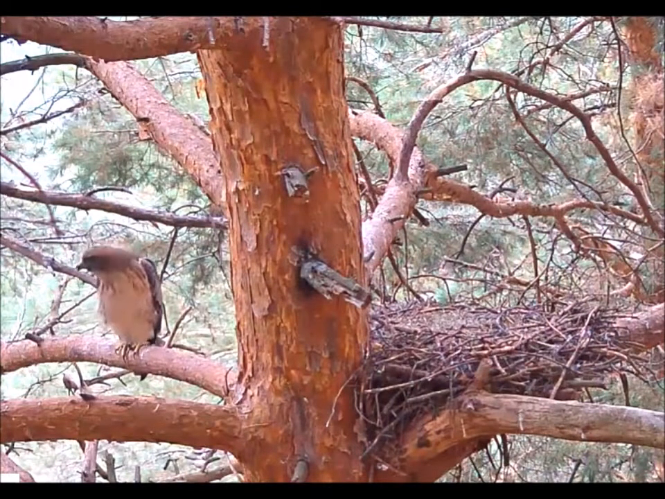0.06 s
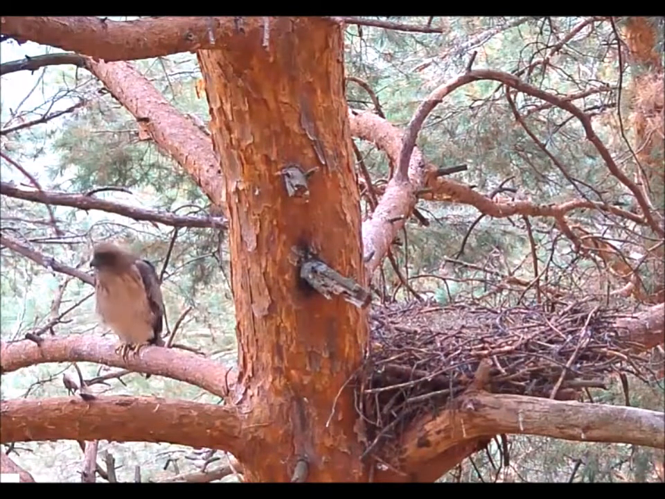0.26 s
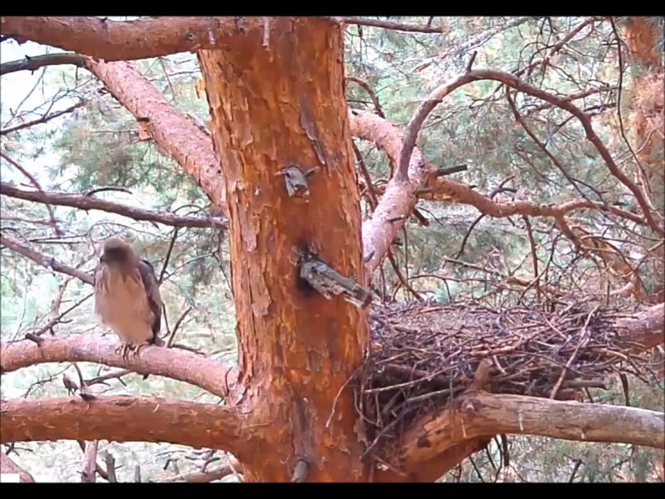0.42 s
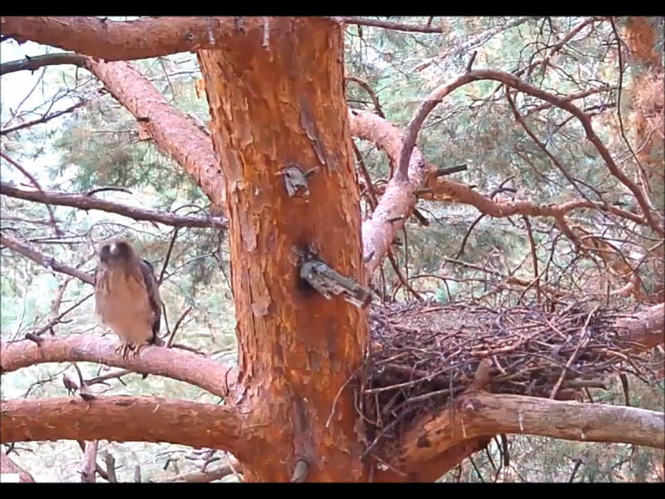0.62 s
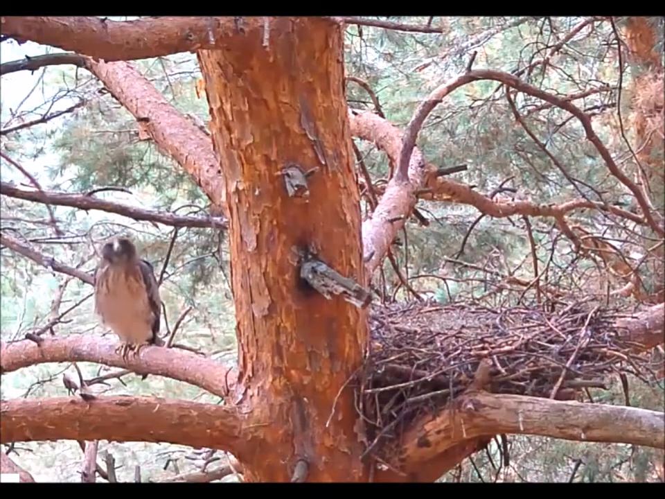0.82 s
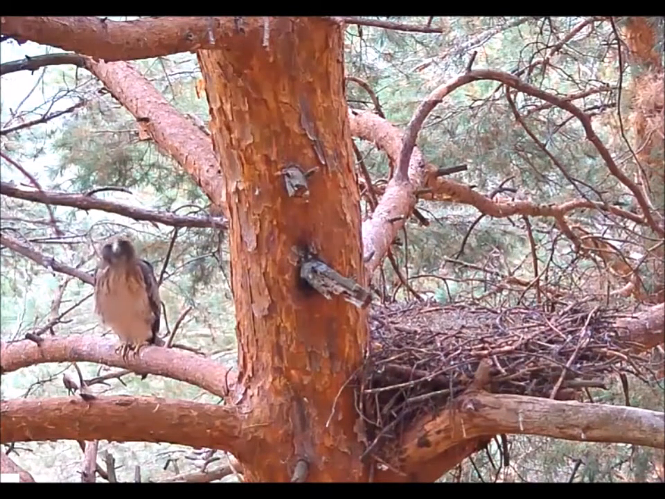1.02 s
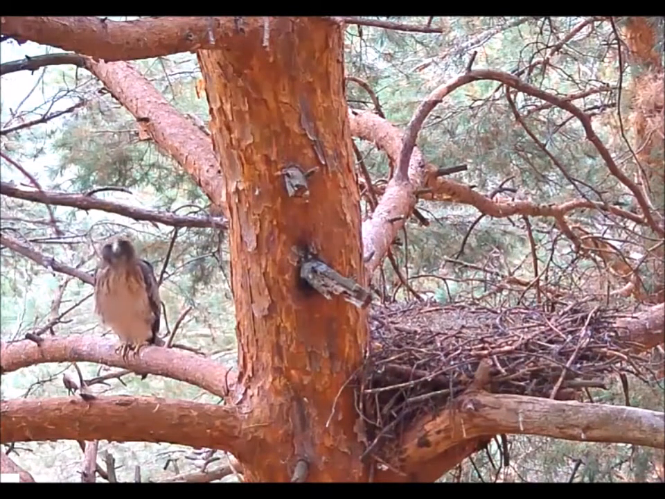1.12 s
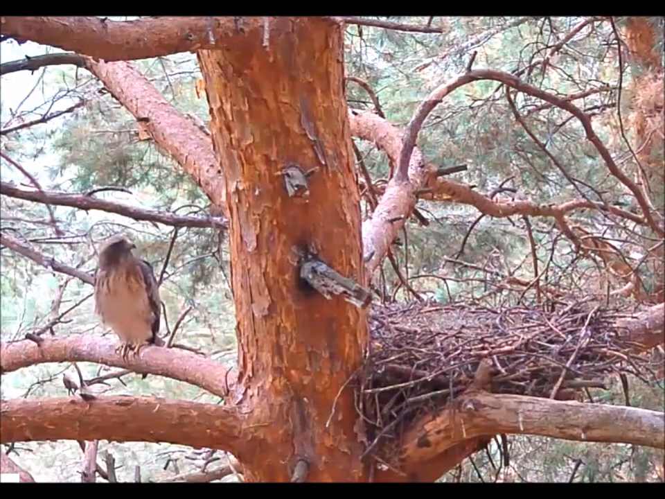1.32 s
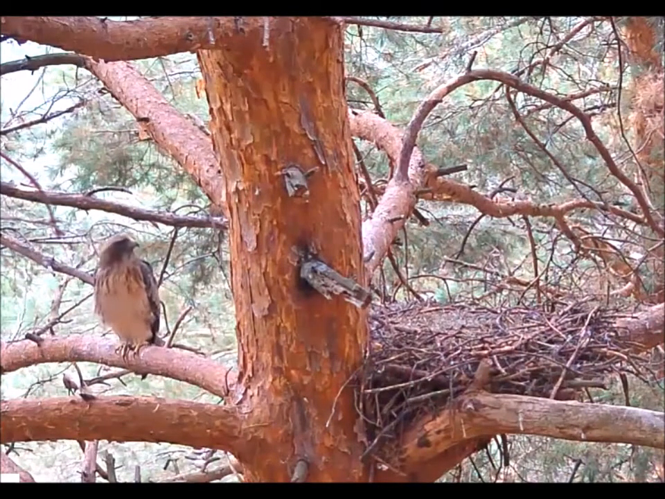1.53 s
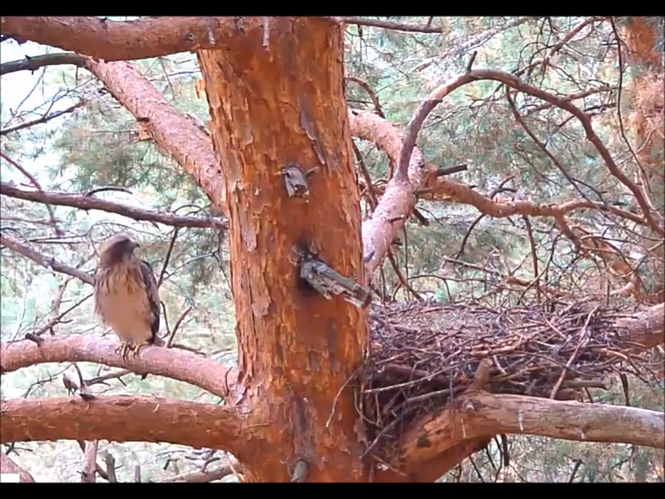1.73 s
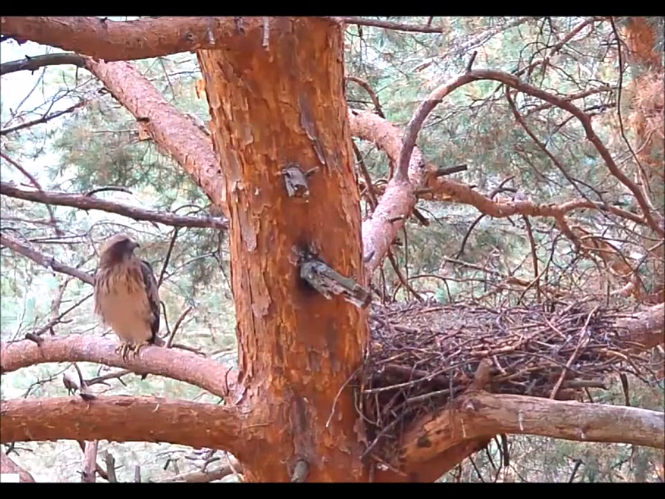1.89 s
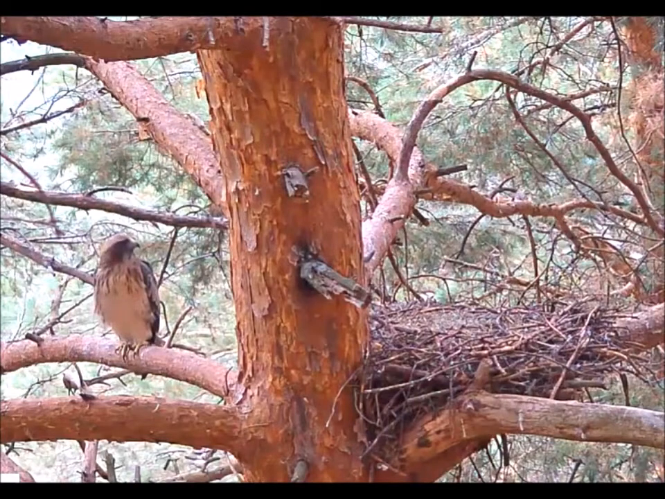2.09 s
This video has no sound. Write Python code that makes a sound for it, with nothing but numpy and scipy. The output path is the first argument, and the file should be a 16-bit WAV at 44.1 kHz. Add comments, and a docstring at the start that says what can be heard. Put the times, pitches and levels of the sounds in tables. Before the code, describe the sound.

A hawk yelps from the start, about five short, piping calls a second, each with a faint squeak and a slightly raspy edge. The calls are strongest until about 0.5 seconds, then a little softer, with the last at about 1.7 seconds. Each leaves a brief echo among the trees. Faint forest hiss and a low rumble of air continue throughout the two seconds.

```python
"""A run of short, piping hawk yelps, five a second, rings through a forest.
The bird calls from a pine branch beside its nest. Each yelp is a faint squeak, then an arch of
pitch whose fourth and eighth harmonics carry the sound, with a raspy edge as it rises.
Trunks and boughs scatter the calls into an echo, over faint hiss and a low rumble of air."""
import sys
import numpy as np
from scipy import signal
from scipy.fft import rfft, irfft, next_fast_len
from scipy.io import wavfile
from scipy.ndimage import map_coordinates

SR = 44100
rng = np.random.default_rng(int(sys.argv[2]) if len(sys.argv) > 2 else 0)


def transcribe(u):
    """Save the signal u as a 16-bit wav file named by the first command-line argument.

    u: samples, shape (n,) or (channels, n), limited to [-1, 1]; the rate is SR.
    q: integer samples, one column per channel.
    """
    v = np.clip(np.atleast_2d(u).T, -1, 1)
    q = np.round(v * 32767).astype(np.int16)
    wavfile.write(sys.argv[1], SR, q)


N = 94815

# The two beds of air. Each row: frequency in Hz, relative level in dB.
HISS_COLOUR = [(150, -19.5), (300, -1.5), (600, -2), (1100, -0.5), (1600, -7), (2500, -5.5), (4000, -6),
               (5500, -5), (7500, -9.5)]
RUMBLE_COLOUR = [(20, -1.5), (38, 1.5), (52, -2.5), (66, 4.5), (90, -4), (112, -10.5), (147, -8.5),
                 (171, -18.5), (221, -22), (330, -40.5), (600, -60)]
# How long the forest rings. Each row: frequency in Hz, seconds to die away by 60 dB.
ECHO_DECAY = [(500, 0.2), (2500, 0.69), (5000, 0.46), (7500, .42)]
# Tone of the echo. Each row: frequency in Hz, relative level in dB.
ECHO_COLOUR = [(600, -29), (2000, -7), (2550, -2), (3000, -1.5), (3700, -15.5), (4600, -0.5), (5100, -5.5),
               (6200, -2.5), (7100, -7.5), (7600, -4.5)]
# Slaps off single trunks. Each row: delay in seconds, level in dB against the call.
TRUNK_SLAPS = [(0.013, -8), (0.033, -9), (.056, -15), (.09, -12.5)]
# The lead-in squeak. Each row: seconds from the yelp's start, pitch in Hz, relative level in dB.
SQUEAK_PATH = [(-.02, 4400, -12), (-.014, 4600, -1), (-.007, 4720, 0), (-.003, 4550, -7), (0, 3600, -15),
               (.003, 2900, -15)]
# The weak harmonics that make the rasp. Each entry: a multiple of the pitch.
RASP_LINES = (1, 2, 3, 5, 6, 7, 9, 10, 11)
# The throat's colour on the rasp. Each row: frequency in Hz, gain in dB.
THROAT_COLOUR = [(630, -12), (1260, -11), (1890, -4.5), (2700, -9.5), (2970, 10.5), (3120, 0.5),
                 (3260, -13.5), (3800, 3.5), (4400, -6.5), (5650, 6), (6000, -9), (6330, -2), (6950, 10),
                 (7300, -7.5)]
# Tone of the voice's noisy edge. Each row: frequency in Hz, relative level in dB.
EDGE_COLOUR = [(1200, -29), (2000, -24), (2350, 1.5), (2700, -15), (3000, 1), (3320, -17), (3800, -8),
               (4150, -19), (4600, -8), (5000, -4.5), (5280, -15.5), (5550, -6), (6000, -11.5), (6800, -6),
               (7600, -12)]
# The arch all yelps share. Each row: share of the length, pitch as a ratio of the top pitch,
# then gains of the 4th, 8th and 12th harmonics in dB.
YELP_ARCH = [(0, .87, -27.5, -18, -25.5), (0.082, .885, -10, -6, -6), (0.201, .925, -14.5, -9.5, -9.5),
             (0.292, .975, -5.5, -8, -13), (0.402, .997, 0.5, -1, -13.5), (0.598, 1.002, -3, -1, -1.5),
             (.75, .997, -1.5, -1, -6), (.87, .975, -3, -6, -1), (1, .92, -14, -17.5, -6)]
# The run of calls. Each row: start in seconds, top pitch in Hz, length in seconds, base levels in dB
# of the 4th, 8th and 12th harmonics and the rasp, rasp tilt in dB per octave, echo in dB, squeak in dB.
YELP_CUES = [(-.09, 624.4, 0.057, -12, -24.5, -30.5, -41, -3, -21.5, -48),
             (0.108, 630.5, .057, -9, -21, -25.5, -41, 2, -20, -40),
             (.302, 632.5, 0.06, -8.5, -22.5, -25.5, -40, 1, -17.5, -37.5),
             (.503, 633.8, 0.046, -11, -23.5, -27.5, -39.5, 0, -17.5, -38),
             (0.689, 643.8, 0.058, -15.5, -25.5, -34.5, -45, -1.5, -19, -36),
             (.887, 639.7, 0.054, -17, -26.5, -32.5, -42.5, 0, -21, -37),
             (1.078, 641.4, 0.053, -15.5, -27, -32, -43, -0.5, -18, -37.5),
             (1.281, 641.7, 0.0566, -17.5, -26.5, -30.5, -43, 0, -20.5, -40),
             (1.513, 621.2, 0.056, -15.5, -27.5, -31, -44, 0.5, -22, -52),
             (1.726, 627.2, 0.065, -18, -29, -36.5, -41, -0.5, -26, -45.5)]

SNAP_S, RELEASE_S = 0.00067, 0.0055  # the snap opens a yelp and cuts off its squeak


def amp(db):
    """Decibels to gain."""
    return 10 ** (np.asarray(db) / 20)


def along(points, hz):
    """Read a curve of (Hz, value) points on a log frequency axis."""
    freqs, values = np.transpose(points)
    return np.interp(np.log(hz + 1), np.log(freqs + 1), values)


def wobble(rate, size):
    """A smooth random curve, rate knots a second."""
    return map_coordinates(rng.standard_normal(size // 8), [np.arange(size) * rate / SR], mode="wrap")


def filtered(x, response):
    """Equalise x with a gain given as a function of Hz."""
    size = next_fast_len(len(x) + 8192)
    return irfft(rfft(x, size) * response(np.fft.rfftfreq(size, 1 / SR)), size)[:len(x)]


def noise(colour, size):
    """Coloured noise of rms 1."""
    x = filtered(rng.standard_normal(size), lambda hz: amp(along(colour, hz)))
    return x / np.sqrt(np.mean(x ** 2) + 1e-20)


def add(track, sound, start_s):
    """Mix a sound in; it may start before the track does."""
    i = round(start_s * SR)
    part = sound[max(-i, 0):len(track) - i]
    track[max(i, 0):][:len(part)] += part


def air(hiss_db=-46.5, rumble_db=-38, fall_db_per_s=2, swell_db=0.7):
    """Steady forest hiss and a low rumble that wavers and slowly eases."""
    rumble_gain = amp(rumble_db - fall_db_per_s * np.arange(N) / SR + swell_db * wobble(2.2, N))
    return amp(hiss_db) * noise(HISS_COLOUR, N) + rumble_gain * noise(RUMBLE_COLOUR, N)


def forest_echo(call, predelay_s=.011, near_t60_s=0.12, bark_hz=3400, scatter_s=.0015):
    """Far trees ring on, near boughs scatter briefly, and single trunks slap back."""
    hz, frame_s, bands = signal.stft(noise(ECHO_COLOUR, SR), SR, nperseg=256)
    decay = amp(-60 * frame_s / along(ECHO_DECAY, hz)[:, None])
    far_tail = signal.istft(bands * decay, SR, nperseg=256)[1]
    t = np.arange(len(far_tail)) / SR
    near_tail = noise(ECHO_COLOUR, len(t)) * amp(-60 * t / near_t60_s)
    fade_in = np.clip(t / predelay_s - 1, 0, 1)
    far, near = (signal.fftconvolve(call, tail * fade_in) for tail in (far_tail, near_tail))
    echo = np.linalg.norm(call) * (far / np.linalg.norm(far) + near / np.linalg.norm(near))
    slap = filtered(call, lambda f: 1 / np.sqrt(1 + (f / bark_hz) ** 8))  # rough bark dulls the top
    for delay_s, db in TRUNK_SLAPS:
        add(echo, amp(db) * slap, delay_s + scatter_s * rng.standard_normal())
    return echo


def squeak():
    """A thin whistle that breaks up as it tumbles down into the yelp."""
    times, hz, db = np.transpose(SQUEAK_PATH)
    t = times[0] + np.arange(SR // 30) / SR
    roughness = np.interp(t, [-.008, 0], [.015, .09])
    pitch = np.interp(t, times, hz) * (1 + roughness * wobble(1400, len(t)))
    level_db = np.interp(t, times, db) + 3 * wobble(600, len(t))
    gate = np.clip((times[-1] - t) / SNAP_S, 0, 1)
    return np.sqrt(2) * gate * amp(level_db) * np.sin(2 * np.pi * np.cumsum(pitch) / SR)


def yelp(top_hz, length_s, h4_db, h8_db, h12_db, rasp_db, tilt_db):
    """One trembling arch of pitch: three clear harmonics, weak rasp between them, and a noisy edge."""
    t = np.arange(SR // 12) / SR
    progress = t / length_s
    share, *curves = np.transpose(YELP_ARCH)
    bend, arch4_db, arch8_db, arch12_db = (np.interp(progress, share, curve) for curve in curves)
    hz = top_hz * bend * (1 + .004 * wobble(450, len(t)))  # the voice trembles
    phase = 2 * np.pi * np.cumsum(hz) / SR

    def harmonic(k, db, flutter_db=1.5):
        """Harmonic k of the voice, its level fluttering."""
        gain = np.sqrt(2) * amp(db + flutter_db * wobble(212.6, len(t)))
        return gain * np.sin(k * phase + rng.uniform(0, 2 * np.pi))

    rolloff_db = 0.1 * np.maximum(12 * hz - 7494, 0)  # the 12th fades as it climbs past 7494 Hz
    clear = harmonic(4, h4_db + arch4_db) + harmonic(8, h8_db + arch8_db)
    clear += harmonic(12, h12_db + arch12_db - rolloff_db)
    rasp = sum(harmonic(k, rasp_db + along(THROAT_COLOUR, k * hz) + tilt_db * np.log2(k / 4))
               for k in RASP_LINES)
    rasp *= amp(np.interp(progress, [.1, .25, .51, 1], [-14, 0, 0, -22.5]))  # swell, hold, fade
    edge_peak, edge_width = 0.18, 0.15  # shares of the length
    edge = noise(EDGE_COLOUR, len(t)) * amp(rasp_db + 15)
    edge *= np.clip(progress / edge_peak, 0, 1) / (1 + ((progress - edge_peak) / edge_width) ** 2)
    gate = np.clip(t / SNAP_S, 0, 1) * np.clip(1 - (t - length_s) / RELEASE_S, 0, 1)
    return gate * (clear + rasp + edge)


def hawk():
    """The run of yelps. The direct sound changes as the head turns; the echo stays more even."""
    track = np.zeros(N)
    for start_s, top_hz, length_s, h4_db, h8_db, h12_db, rasp_db, tilt_db, echo_db, squeak_db in YELP_CUES:
        call = yelp(top_hz, length_s, h4_db, h8_db, h12_db, rasp_db, tilt_db)
        add(track, call, start_s)
        echo_send = amp(echo_db - h4_db)  # the 4th harmonic's echo follows echo_db alone
        add(track, echo_send * forest_echo(call), start_s)
        add(track, amp(squeak_db) * squeak(), start_s + SQUEAK_PATH[0][0])
    return track


def scene():
    """The bird and the air around it, in mono."""
    return (hawk() + air())[None]


def record(dry, top_hz=7540):
    """A brick-wall low-pass takes the top off the mix."""
    return np.array([filtered(x, lambda hz: 1 / np.sqrt(1 + (hz / top_hz) ** 240)) for x in dry])


dry = scene()
out = record(dry)
transcribe(out)
```